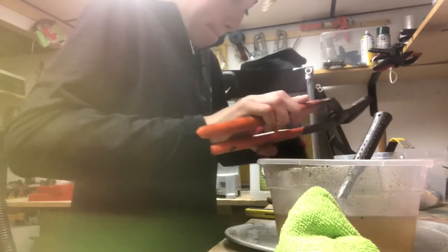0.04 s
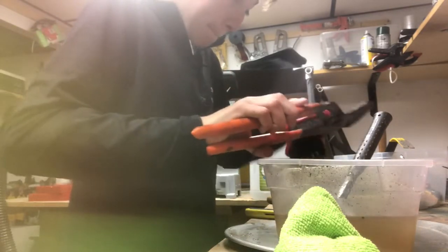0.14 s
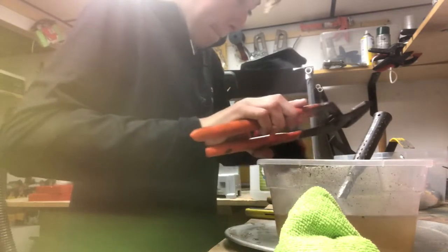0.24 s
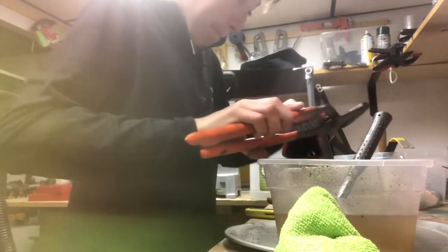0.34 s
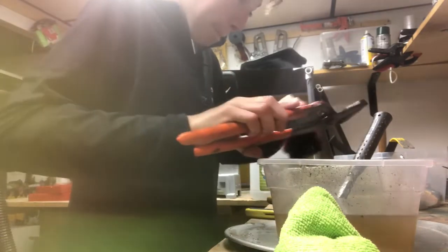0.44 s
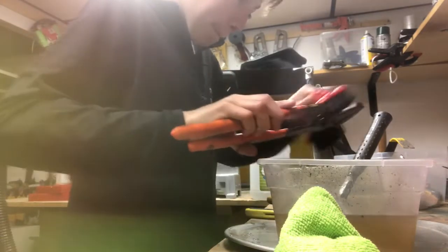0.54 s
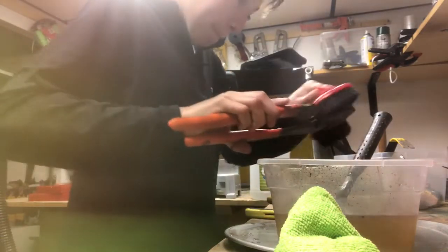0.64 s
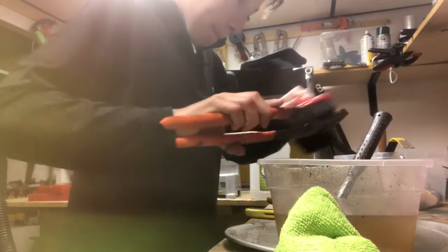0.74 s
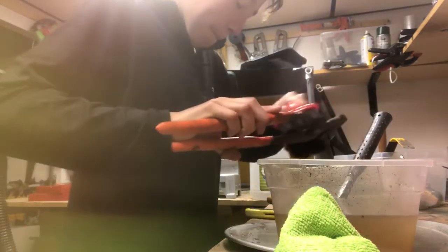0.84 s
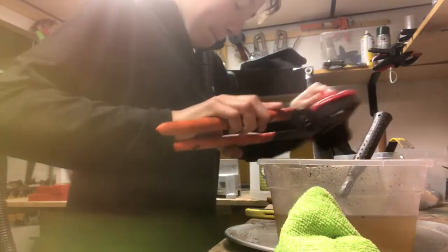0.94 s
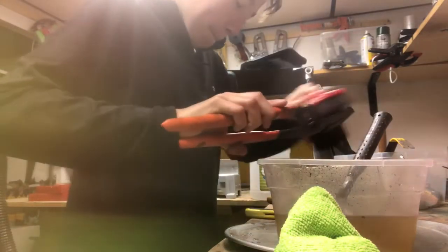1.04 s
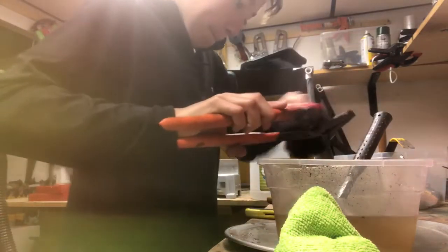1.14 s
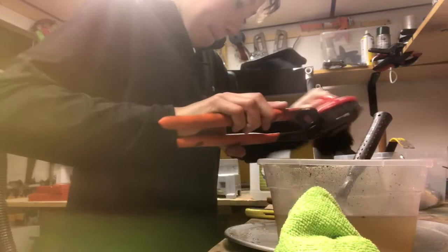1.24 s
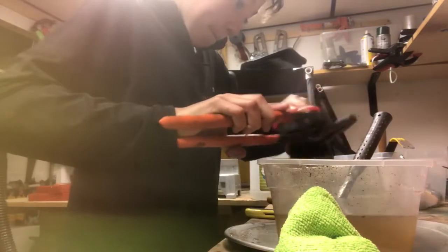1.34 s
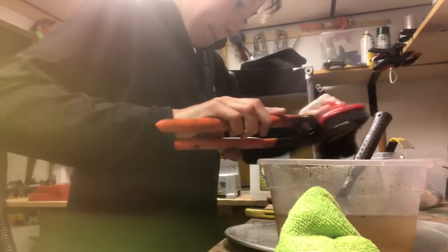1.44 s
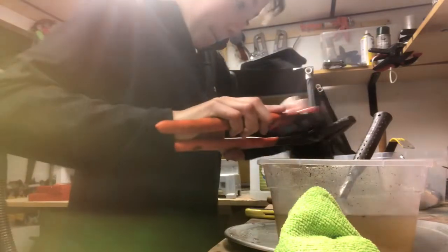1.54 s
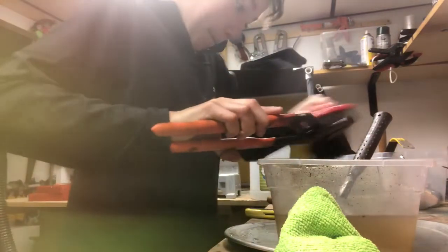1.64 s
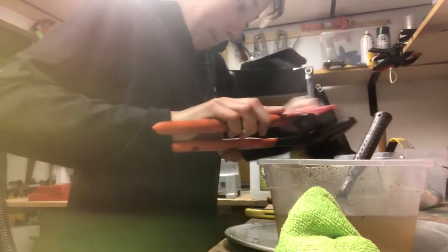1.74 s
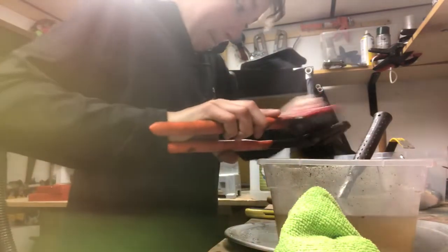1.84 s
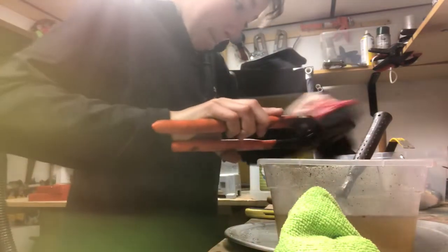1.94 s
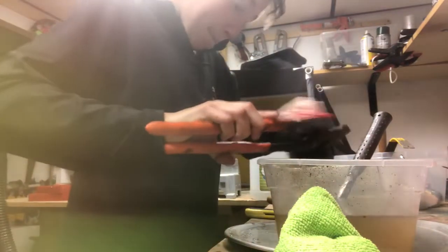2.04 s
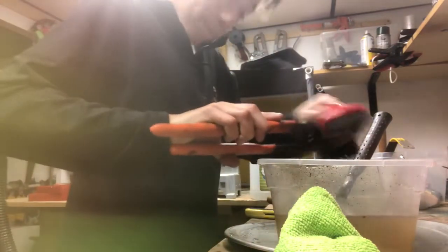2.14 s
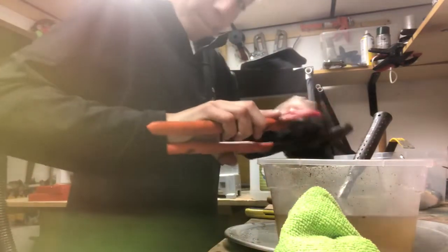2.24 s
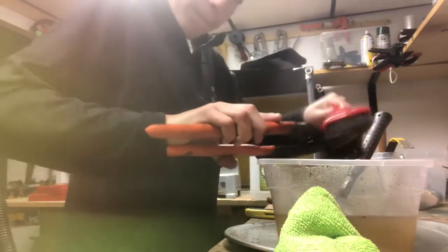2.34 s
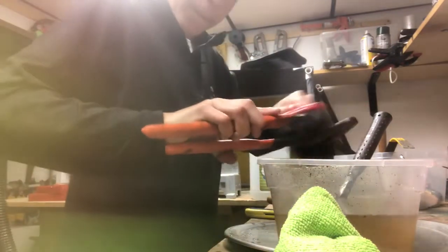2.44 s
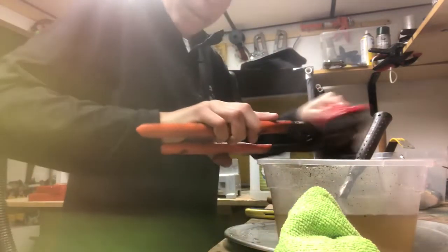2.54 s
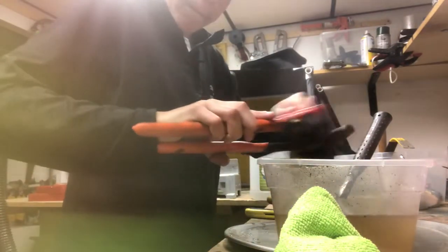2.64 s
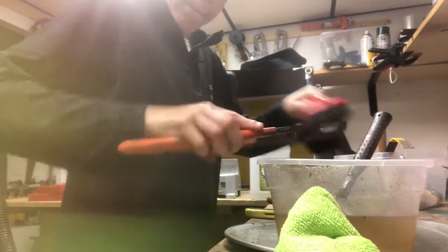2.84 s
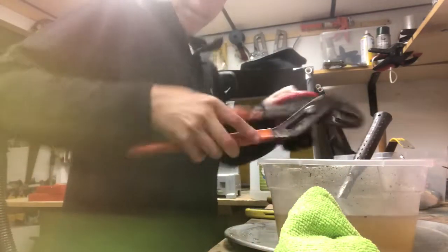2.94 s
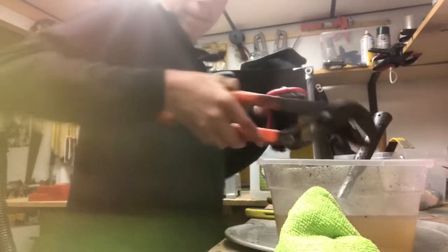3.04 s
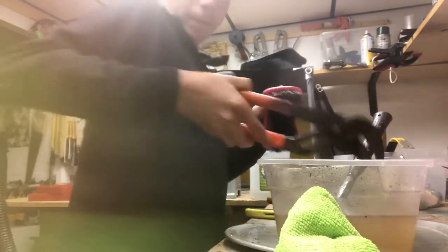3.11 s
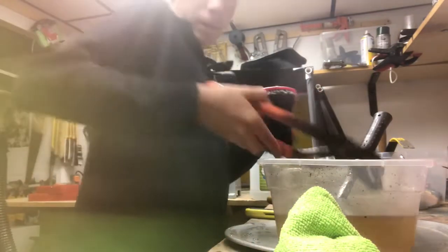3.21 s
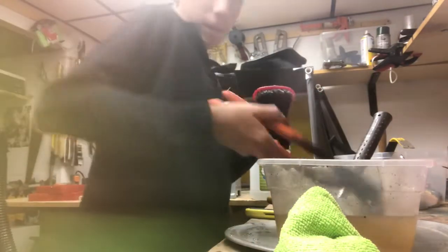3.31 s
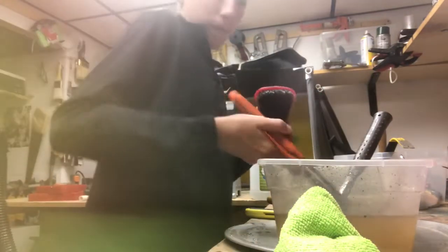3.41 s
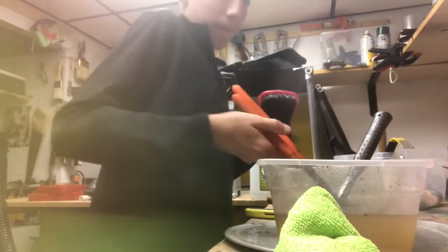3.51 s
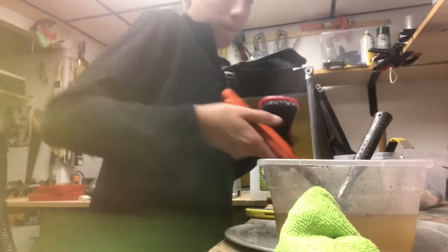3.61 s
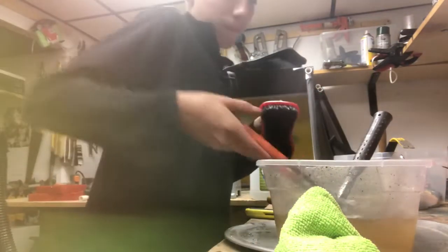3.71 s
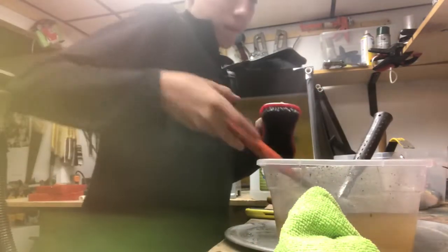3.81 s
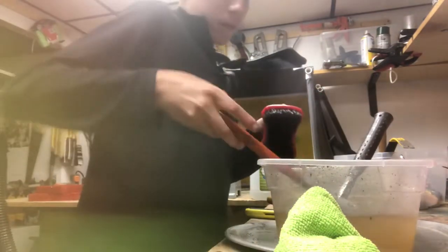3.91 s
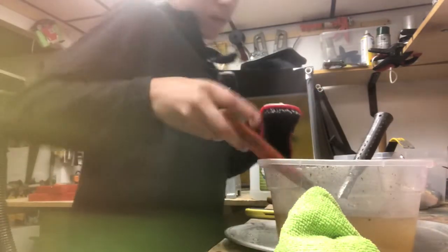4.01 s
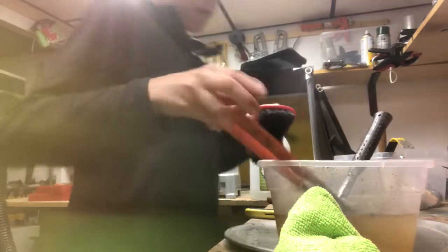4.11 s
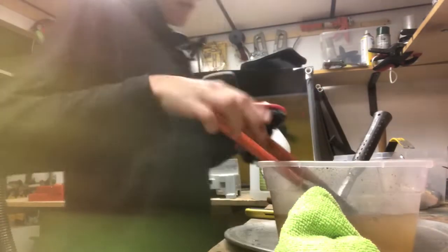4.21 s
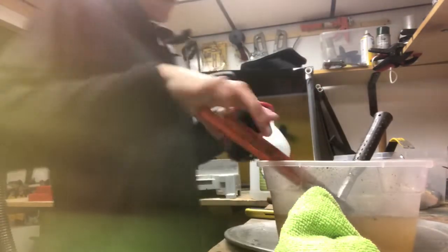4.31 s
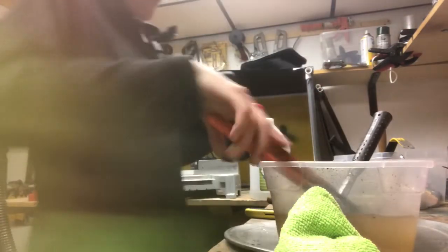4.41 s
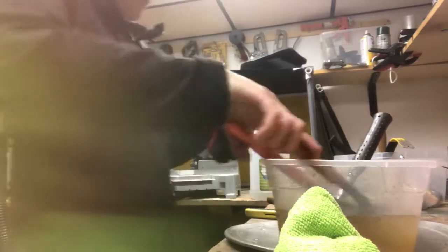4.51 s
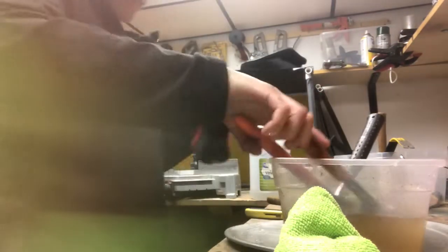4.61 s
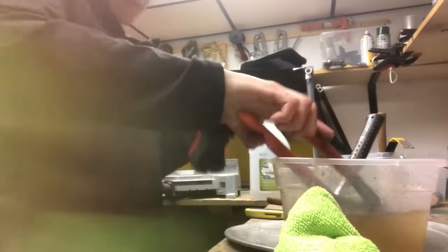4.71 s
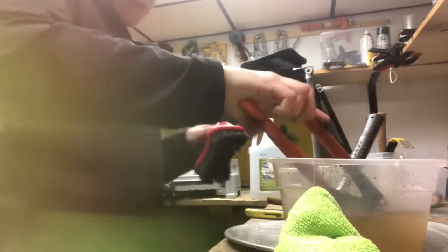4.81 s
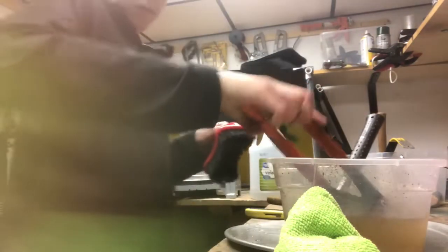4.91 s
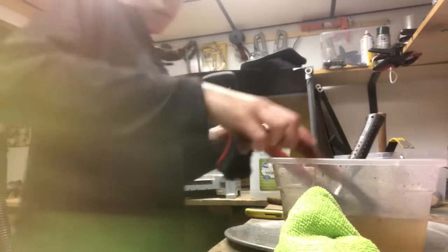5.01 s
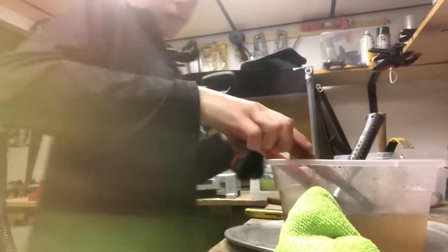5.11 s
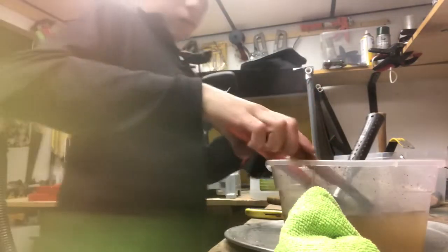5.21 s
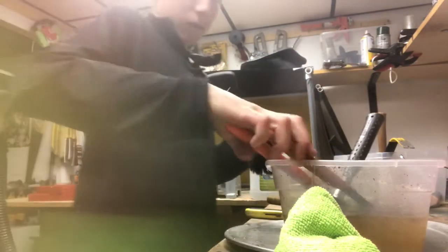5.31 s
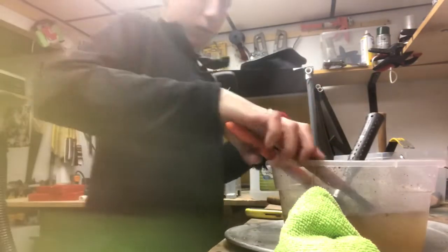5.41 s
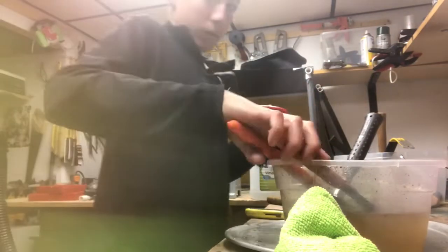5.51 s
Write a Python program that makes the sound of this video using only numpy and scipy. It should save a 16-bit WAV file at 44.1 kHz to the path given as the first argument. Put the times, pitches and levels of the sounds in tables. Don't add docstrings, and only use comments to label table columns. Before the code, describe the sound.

Close phone-like pickup in a short, dry room with faint low hum. Rapid back-and-forth bristle scrubbing, bright and gritty, stops briefly, resumes stronger, then ends in a hard tick. After a short gap, tools clunk loudly against thin plastic walls, drag and rub with low rumbles; lighter knocks follow, then a smooth rubbery wipe fades out.

```python
import sys
import numpy as np
from scipy import signal
from scipy.fft import rfft, irfft, next_fast_len
from scipy.io import wavfile
from scipy.ndimage import uniform_filter1d, map_coordinates

SR = 44100
rng = np.random.default_rng(int(sys.argv[2]) if len(sys.argv) > 2 else 0)


def store_wav(level_fs):
    pcm = np.round(np.clip(np.atleast_2d(level_fs), -1, 1) * 32767)
    wavfile.write(sys.argv[1], SR, pcm.T.astype(np.int16))


def voltage_ratio(decibels):
    exponent = np.asarray(decibels, float) / 20
    return 10 ** exponent


N = 244753


def unit(x):
    return x / np.sqrt(np.mean(x ** 2) + 1e-20)


def along(points, hz):
    f, v = np.transpose(points)
    return np.interp(np.log(hz + 1), np.log(f + 1), v)


def filtered(x, response):
    m = next_fast_len(N + 8192)
    return irfft(rfft(x, m) * response(np.fft.rfftfreq(m, 1 / SR)), m)[:N]


def resonances(peaks):
    def response(f):
        total = 0
        for k, (centre, width, db) in enumerate(peaks):
            damping = 1j * f * width
            total = total + (-1) ** k * voltage_ratio(db) * damping / (centre * centre - f * f + damping)
        return total
    return response


def wobble(rate):
    knots = rng.standard_normal(int(N * rate / SR) + 4)
    return map_coordinates(knots, [np.arange(N) * rate / SR])


def rush(spectrum, patchy_db, grit_db):
    contacts = rng.standard_normal(N) * voltage_ratio(grit_db * wobble(600))
    z = signal.stft(contacts, nperseg=256)[2]
    field = uniform_filter1d(rng.standard_normal(z.shape), size=5, axis=0)
    field = uniform_filter1d(field, size=6, axis=1)
    patchy = signal.istft(z * voltage_ratio(patchy_db * unit(field)), nperseg=256)[1][:N]
    return unit(filtered(patchy, lambda hz: voltage_ratio(along(spectrum, hz))))


def room_tone():
    # hz, density_db
    quiet = [(12, -73), (20, -36), (41, -18), (65, -10), (110, -10), (130, -10), (254, -9), (317, -13),
             (386, -9), (1500, -21), (3200, -27), (6290, -27.5), (8090, -31), (15800, -36)]
    # hz, width_hz, level_db
    machines = [(7800, 160, -88), (13900, 50, -111)]
    whines = np.zeros(N)
    for hz, width, db in machines:
        band = filtered(rng.standard_normal(N), lambda f: 1 / (1 + ((f - hz) / width * 2) ** 2))
        whines += voltage_ratio(db) * unit(band)
    motor_hz = 59.5 + 1.44 * wobble(8)
    motor = voltage_ratio(-73 + 1.5 * wobble(6)) * np.sin(2 * np.pi * np.cumsum(motor_hz) / SR)
    hush = voltage_ratio(-69.5 + 0.81 * wobble(4.47)) * rush(quiet, patchy_db=1.25, grit_db=0.85)
    return hush + whines + motor


def brush():
    # top_speed_s, level_db, length_s
    strokes = [(0.004, -55, 0.074), (0.097, -52, 0.095), (0.19, -55, 0.11), (0.287, -51.5, 0.092),
               (0.389, -55.5, 0.11), (0.47, -80, 0.097), (0.735, -60, 0.1), (0.86, -54, 0.22),
               (1.009, -53, 0.11), (1.135, -49, 0.14), (1.247, -51, .114), (1.364, -49, .108),
               (1.466, -50.5, 0.098), (1.589, -48.5, 0.13), (1.697, -49.5, 0.1), (1.818, -49.5, 0.13),
               (1.925, -48.5, 0.098), (2.035, -48, 0.12), (2.143, -49, 0.098), (2.256, -49, 0.12),
               (2.363, -49.5, 0.097), (2.482, -48.5, 0.12), (2.593, -49, 0.086), (2.691, -47.5, 0.099),
               (2.793, -49, 0.1)]
    # speeding_up_share, fizz_db, handle_db, run_up_heard, grip_at_once (0-1)
    directions = [(.54, -3.5, -10.5, 1.125, 0.16), (.64, -4.5, -11.5, 0.64, 0.47)]
    # hz, width_hz, level_db
    steel = [(2405, 120, -1.5), (2975, 370, -2.5), (3400, 82, -1.5), (3750, 330, 0), (4360, 130, 1.5),
             (4600, 220, -0.5), (5580, 660, -0.5), (6440, 450, 0.5), (7600, 1400, -8)]
    # hz, density_db
    bristle = [(1100, -20), (1900, -15), (2500, -1), (2900, 1.5), (3900, 1), (5200, -3.5), (7500, -4.5),
               (8600, -23), (10500, -67)]
    # hz, density_db
    tips = [(4410, -29), (7500, -2), (8560, -4.5), (13100, -2.5), (15100, -1), (15600, -12)]
    # hz, density_db
    grips = [(88, -8), (150, -8.5), (245, -2.5), (353, -6.5), (678, 1), (976, -6.5), (1260, -3.5),
             (2300, -6.5), (2990, -53), (5060, -120)]
    push = np.zeros((3, N + SR))
    t = np.arange(-SR // 8, SR // 8) / SR
    for k, (s, db, length) in enumerate(strokes):
        share, fizz_db, handle_db, reach, grip = directions[k % 2]
        rise_s, fall_s = reach * share * length, 1.26 * (1 - share) * length
        phase = np.clip(np.where(t < 0, t / rise_s, t / fall_s), -1, 1)
        swing = np.abs(np.cos(np.pi / 2 * phase))
        speed = np.where(t < 0, grip + (1 - grip) * swing ** 0.93, swing) * (np.abs(phase) < 1)
        firmer_db = db + 51
        extra_db = np.array([[0], [fizz_db + 0.27 * firmer_db], [handle_db + 0.12 * firmer_db]])
        shapes = np.array([speed ** 2.0, speed * swing ** 0.99, speed ** 1.16])
        push[:, round(s * SR):][:, :len(t)] += voltage_ratio(db + extra_db) * shapes
    push = push[:, SR // 8:][:, :N]
    rasp = rush(bristle, patchy_db=4.0, grit_db=0.5)
    ringing = unit(filtered(rush(bristle, patchy_db=-4.5, grit_db=-2), resonances(steel)))
    jaws = unit(0.68 * rasp + 0.61 * ringing)
    fizz = rush(tips, patchy_db=1.5, grit_db=0.5)
    handle = rush(grips, patchy_db=2.5, grit_db=-1.0)
    return voltage_ratio(0.89 * wobble(70)) * (push[0] * jaws + push[1] * fizz) + push[2] * handle


def shop(x):
    # hz, t60_s
    decay = [(100, 0.51), (1000, 0.17), (5000, 0.23), (14000, 0.18)]
    hz, t, z = signal.stft(rng.standard_normal(SR // 2), SR, nperseg=256)
    tail = signal.istft(z * voltage_ratio(-60 * t / along(decay, hz)[:, None]), SR, nperseg=256)[1]
    return signal.fftconvolve(np.pad(x, (250, 0)), tail / np.linalg.norm(tail))[:N]


def knocks():
    # start_s, peak_db, weight_db, hardness_db
    blows = [(.308, -44.5, -7.5, -16), (.338, -50.5, -16, -3.5), (2.705, -44.5, 0.5, 0.5),
             (2.726, -50.5, 3, -4), (3.385, -41.5, -16, -9), (3.448, -20.5, -10.5, -11),
             (3.682, -50.5, 2, -7.5), (3.771, -22, -6.5, -26.5), (3.826, -23.5, -5.5, -8.5),
             (3.878, -33, -14, -8.5), (3.995, -53, -9, -8), (4.064, -55, -6, -5), (4.089, -35, 8, -11.5),
             (4.207, -50.5, -12, -6.5), (4.232, -45.5, -15, -8.5), (4.369, -44, 3, 0.5),
             (4.541, -44.5, 5, -10), (4.556, -23, -9, -10.5), (4.669, -61.5, -11, -1.5),
             (4.935, -44.5, -8.5, -19), (4.997, -44.5, -11, -9.5), (5.027, -42.5, -2.5, -28),
             (5.071, -44.5, -7, -17), (5.088, -28, -11, -18.5), (5.395, -52, 0.5, -15)]
    # hz, level_db, t60_s
    clear = [(119, -21, 0.16), (175, -7, 0.14), (229.2, 8, 0.16), (287.5, 1, 0.13), (442, 8, 0.069),
             (557, -1.5, 0.12), (642, -1.5, 0.1), (719, -5.5, 0.14), (798, 1, 0.053), (978, -10, 0.076),
             (1010, 0, 0.054), (1187, 6.5, 0.049), (1370, 7, 0.043), (1696, 4.5, 0.056), (2380, 10, 0.04)]
    # hz, level_db, t60_s
    dense = [(60, -9.5, 0.78), (127, -1, 0.32), (266, 5, 0.2), (600, 2.5, 0.099), (1180, 0, 0.12),
             (2530, 4, 0.13), (4770, 4.5, 0.13), (8200, -5, 0.12), (13400, -9.5, .07)]
    out, t = np.zeros(N + SR), np.arange(SR // 3) / SR
    f = np.fft.rfftfreq(len(t), 1 / SR)
    centres = np.transpose(dense)[0]
    bands = np.array([along(list(zip(centres, row)), f) for row in np.eye(len(dense))])
    clear_hz, clear_db, clear_t60 = np.transpose(clear)[:, :, None]
    dense_hz, dense_db, dense_t60 = np.transpose(dense)[:, :, None]
    for s, db, weight_db, hard_db in blows:
        boom_db = -11.5 + 0.26 * weight_db
        click_db = -3.5 + 1.4 * hard_db - 0.075 * (db + 37)
        contact = [(120, boom_db), (350, weight_db), (950, 0), (2300, hard_db), (6000, click_db),
                   (12000, 6 + 1.28 * click_db)]

        def fade(hz, level, t60):
            swell = 1 - np.exp(-t * t * hz / 0.012)
            return voltage_ratio(level + along(contact, hz) - 60 * t / t60) * swell

        luck = rng.standard_normal((2, len(clear), 1))
        tones = np.sin(2 * np.pi * clear_hz * (1 + .01 * luck[1]) * t + 3 * luck[1])
        ring = fade(clear_hz, clear_db + 2.5 * luck[0], clear_t60) * tones
        crowd = irfft(rfft(rng.standard_normal(len(t))) * bands, len(t))
        crowd = crowd / crowd.std(axis=1, keepdims=True) * fade(dense_hz, dense_db, dense_t60)
        crowd *= 1 + voltage_ratio(-0.5 - 60 * t / 0.027)
        colour = voltage_ratio(along(contact, f) + along(np.array(dense)[:, :2], f)) * 900 / (f + 150)
        lag = np.exp(-4j * np.pi * 0.1078 * (np.sqrt(f) - f / 250))
        sweep = irfft(colour * lag, len(t)) * (t < .06)
        blow = voltage_ratio(db - 11.5) * ring.sum(axis=0) + voltage_ratio(db - 12.5) * crowd.sum(axis=0) + voltage_ratio(db + 28) * sweep
        out[round(s * SR):][:len(t)] += blow
    return out[:N]


def snaps():
    # start_s, peak_db, t60_s, tail_db
    cracks = [(0.478, -51, .015, -11), (0.697, -46.5, 0.015, 3), (2.8995, -22.5, 0.0073, -22),
              (3.522, -43.5, .012, -4), (3.424, -60, .01, -12), (4.369, -39, .012, -12),
              (5.244, -51.5, 0.031, 0), (5.252, -42.5, 0.021, -15), (5.269, -49, .02, -15),
              (5.277, -53, .02, -15)]
    # hz, density_db
    colour = [(800, -23), (1400, -4.5), (3000, 2), (7000, -2.5), (10000, -17), (15600, -26)]
    crack, blow, t = np.zeros(N), np.zeros(N + SR), np.arange(SR // 8) / SR
    for s, db, t60, tail_db in cracks:
        crack[round(s * SR)] = voltage_ratio(db + 14.0 - 510 * t60)
        body = voltage_ratio(270 * t60 - 9.0 - 60 * t / t60)
        rattle = voltage_ratio(tail_db - 60 * t / 0.079)
        blow[round(s * SR):][:len(t)] += voltage_ratio(db - 8.5) * (body + rattle) * (1 - np.exp(-t / 0.0002))
    ticks = filtered(crack, lambda hz: voltage_ratio(along(colour, hz)))
    return ticks + blow[:N] * rush(colour, patchy_db=1, grit_db=1)


def bubbles():
    # start_s, peak_db, pitch_hz, t60_s, rise_share
    pings = [(.697, -43.5, 3200, 0.034, .01), (3.4, -41, 1056, 0.086, .04), (3.42, -49, 600, 0.06, 0.072),
             (.699, -48.5, 4600, 0.033, 0.0089), (3.433, -56, 1880, 0.063, .05),
             (3.496, -52, 4890, 0.064, .015), (3.51, -52, 2900, 0.063, .05),
             (3.524, -28.5, 3060, 0.016, 0.052), (3.529, -51, 3260, 0.11, .01),
             (4.088, -40, 3080, 0.015, .01), (5.137, -58, 4600, 0.027, .02)]
    out, t = np.zeros(N + SR), np.arange(SR // 4) / SR
    for s, db, hz, t60, rise in pings:
        turns = hz * (t + rise * t * t / t60)
        envelope = voltage_ratio(db - 60 * t / t60) * (1 - np.exp(-t / 0.00042))
        out[round(s * SR):][:len(t)] += envelope * np.sin(2 * np.pi * turns)
    return out[:N] * voltage_ratio(3 * wobble(250))


def movement(start, length, db):
    t = np.arange(N) / SR
    build_db_per_s, ease_db_per_s = 240, 176
    early, late = np.clip(start - t, 0, None), np.clip(t - start - length, 0, None)
    return voltage_ratio(db - build_db_per_s * early - ease_db_per_s * late)


def slide():
    # start_s, length_s, pressure_db, speed_db
    drags = [
        (3.712, 0.063, -58.5, -12.5),
        (3.85, 0.053, -63, -9),
        (4.01, 0.15, -64.5, -6),
        (4.214, .17, -66, -9),
        (4.454, 0.085, -58.5, 2),
        (4.517, 0.033, -56.5, -14),
        (4.72, 0.068, -75.5, -5),
        (4.94, .2, -74, -3),
        (5.21, 0.11, -71.5, -15),
    ]
    # start_s, length_s, level_db, spray_db
    plunge = (3.5, 0.07, -58.5, -5.5)
    # start_s, length_s, level_db
    shoves = [
        (3.42, .04, -68),
        (3.75, .1, -72),
        (3.886, .08, -54.5),
        (4.064, 0.12, -61.5),
        (4.39, 0.033, -60),
        (4.575, .02, -56),
        (4.72, 0.089, -72),
        (5.1, 0.034, -59.5),
    ]
    # hz, density_db
    rough = [(290, -36), (500, -4), (846, -2), (923, 0.5), (1790, -6.5), (2800, -19.5), (3640, -38),
             (6160, -120)]
    # hz, density_db
    fine = [(1290, -29), (2200, -3), (4530, -6), (5420, -9.5), (5790, -11.5), (6490, -14), (15600, -32.5)]
    # hz, density_db
    wall = [(90, -53), (130, 1), (230, 2), (450, -7), (650, 1), (900, -38.5)]
    # hz, density_db
    bench_top = [(15, -59), (35, -3), (60, 12.5), (110, 14.5), (170, -74)]
    s, length, db, spray_db = plunge
    pressure = sum(movement(*row[:3]) for row in drags)
    speed = sum(voltage_ratio(row[3]) * movement(*row[:3]) for row in drags) + movement(s, length, db + spray_db)
    walls = voltage_ratio(1) * pressure + movement(s, length, db)
    slips = wobble(60)
    scrape = pressure * voltage_ratio(0.83 * slips) * rush(rough, patchy_db=2.5, grit_db=2.0)
    hiss = speed * voltage_ratio(1 * slips) * rush(fine, patchy_db=3.0, grit_db=1.5)
    drone = walls * voltage_ratio(2 * slips) * rush(wall, patchy_db=2.5, grit_db=1.5)
    bench = sum(movement(*row) for row in shoves) * voltage_ratio(3.4 * wobble(15))
    return scrape + hiss + drone + bench * rush(bench_top, patchy_db=-4.0, grit_db=-2)


def wipe():
    # time_s, level_db
    swish = [
        (5.24, -72),
        (5.254, -63),
        (5.262, -62.5),
        (5.388, -51.5),
        (5.504, -64),
        (5.544, -78),
        (5.55, -70),
    ]
    # hz, density_db
    glove = [(120, -14), (200, -17), (299, -6.5), (415, -2), (498, -16), (597, -3.5), (691, -8),
             (1130, -3.5), (2100, -14.5), (4120, -13), (15600, -32)]
    s, db = np.transpose(swish)
    level_db = np.interp(np.arange(N) / SR, s, db, left=-120)
    return voltage_ratio(level_db) * rush(glove, patchy_db=2, grit_db=2.2)


def scene():
    scrub = brush()
    tub = knocks() + snaps() + bubbles()
    answer = shop(voltage_ratio(-8.5) * scrub + voltage_ratio(-14.0) * tub)
    return (room_tone() + scrub + tub + answer + slide() + wipe())[None]


def top_cut(x):
    return signal.sosfilt(signal.butter(12, 15960, fs=SR, output="sos"), x)


def record(dry):
    # hz, gain_db
    microphone = [(20, -24), (45, -1), (70, 0), (15800, 0), (16100, -40)]
    mix = filtered(dry[0], lambda hz: voltage_ratio(along(microphone, hz)))[None]
    return top_cut(mix)


dry = scene()
out = record(dry)
store_wav(out)
```